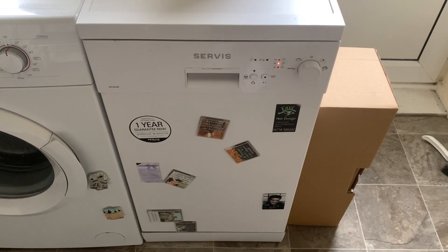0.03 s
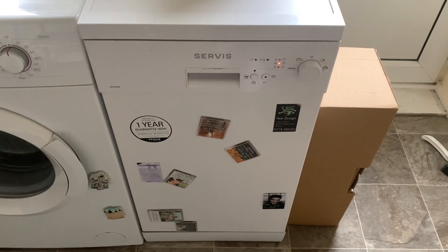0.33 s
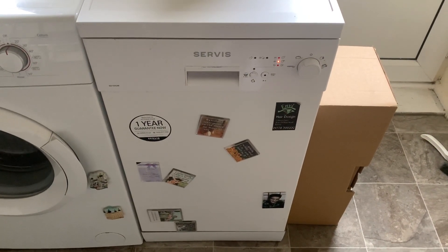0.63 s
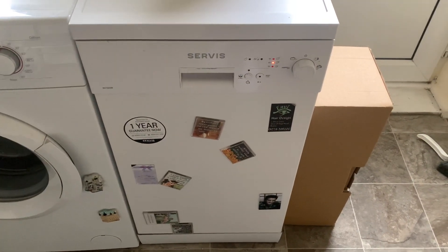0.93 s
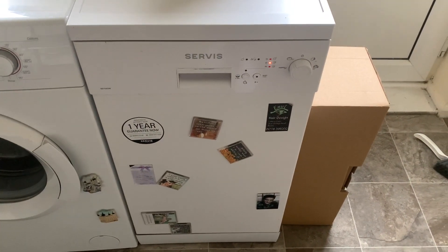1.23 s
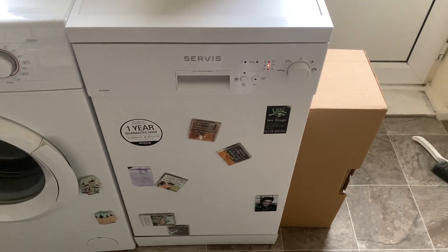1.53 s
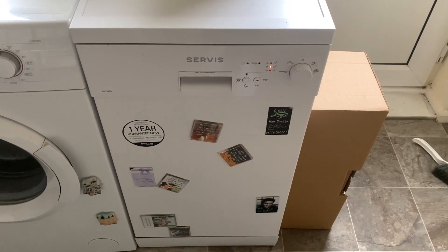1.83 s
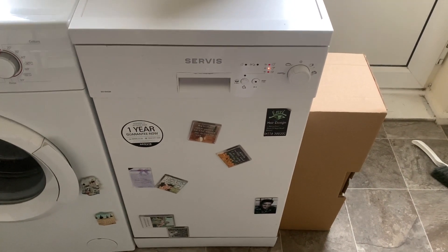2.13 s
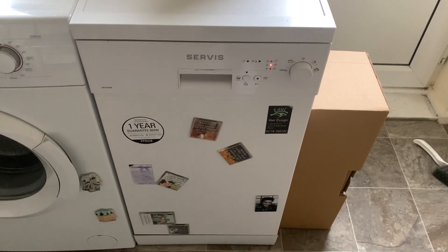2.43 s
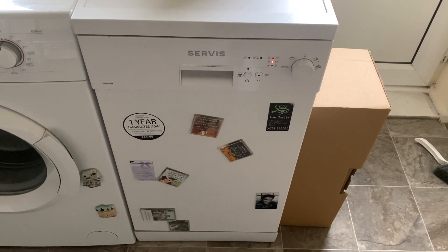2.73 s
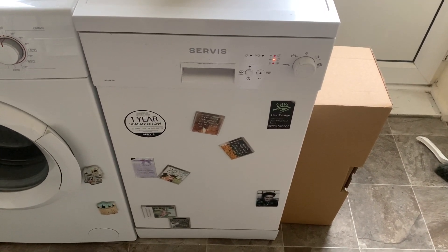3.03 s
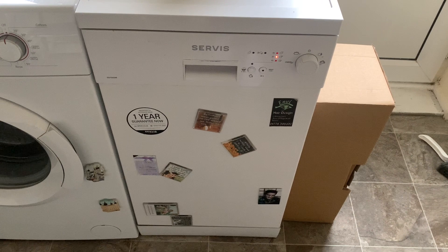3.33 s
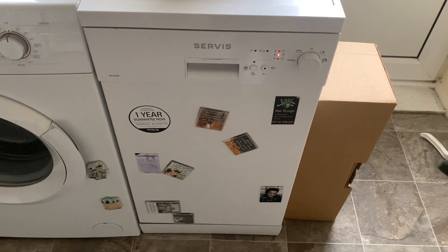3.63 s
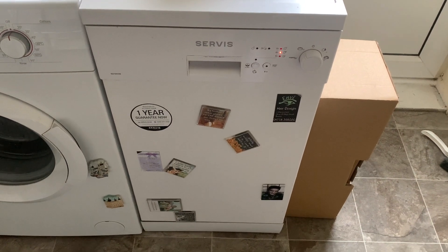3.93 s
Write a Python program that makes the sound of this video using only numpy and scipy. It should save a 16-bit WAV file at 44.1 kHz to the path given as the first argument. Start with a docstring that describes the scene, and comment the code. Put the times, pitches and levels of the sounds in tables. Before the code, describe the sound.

A dishwasher hums and rumbles steadily in a kitchen while spray patters inside and jets slap the walls and dishes. A faint short note opens, then a finger bumps and brushes the nearby microphone once, and the washing continues.

```python
"""A low, booming hum under a wash of spray: a dishwasher mid-cycle in a small tiled kitchen.
The pump hums on multiples of the mains frequency and whines faintly; the cabinet booms with it
and churning water rumbles the panels. Spray hisses and patters in the ringing tub, and jets slap
the walls and dishes. A short, soft note sounds at the very start; about a third of a second in,
a finger ticks and slides once on a hand-held camera."""
import sys
import numpy as np
from scipy import signal
from scipy.fft import rfft, irfft
from scipy.io import wavfile
from scipy.ndimage import uniform_filter1d

SR = 44100
rng = np.random.default_rng(int(sys.argv[2]) if len(sys.argv) > 2 else 0)


def bounce(signal):
    """Save signal as a 16-bit WAV file at the path given by the first command-line argument."""
    frames = np.transpose(np.atleast_2d(signal))
    limited = np.clip(frames, -1, 1)
    pcm = np.round(limited * 32767).astype(np.int16)
    wavfile.write(sys.argv[1], SR, pcm)


N = 176400
TIME_S = np.arange(N) / SR
FREQ_HZ = np.fft.rfftfreq(N, 1 / SR)
LEFT_LEADS_S = .000285

# Stereo placement, with the lows leaning right: frequency_hz, left_minus_right_db
BALANCE = [(50, -5), (85, -5), (120, -3.5), (150, -6), (176, -11), (215, -5), (330, -4), (450, -.5),
           (700, 0), (2400, -.5), (4200, -1.5), (5400, -3), (6700, -1)]


def amp(db):
    """Decibels to gain."""
    return 10 ** (np.asarray(db) / 20)


def unit_rms(x):
    """Scales a signal to an rms of one."""
    return x / np.sqrt(np.mean(abs(x) ** 2) + 1e-30)


def curve_at(points, hz):
    """Reads a curve along a logarithmic frequency axis."""
    point_hz, value = np.transpose(points)
    return np.interp(np.log(hz + 1), np.log(point_hz + 1), value)


def pan(hz):
    """Left and right gains that place each frequency in the stereo image."""
    lean_db = np.atleast_1d(curve_at(BALANCE, hz))
    return amp(np.array([lean_db, -lean_db]) / 2)


def lowpass(x, cutoff_hz, order):
    """Rolls off the highs without shifting phase."""
    return irfft(rfft(x) / (1 + (FREQ_HZ / cutoff_hz) ** order), N)


def drift(rate_hz):
    """Slow random movement with an rms of one."""
    return unit_rms(lowpass(rng.standard_normal(N), rate_hz, order=4))


def white():
    """Two unrelated white noises."""
    return rng.standard_normal((2, N))


def add(mix, start_s, sound):
    """Lays a sound into the mix at its start time."""
    part = mix[:, round(start_s * SR):][:, :sound.shape[1]]
    part += sound[:, :part.shape[1]]


def stereo_noise(pair, db_per_hz):
    """Colours and pans two white signals; the part they share reaches the left side first."""
    # How alike the two sides are, near mono in the bass: frequency_hz, coherence (0-1)
    likeness = [(60, .96), (150, .97), (300, .78), (600, .42), (1400, .3), (2500, .25), (4200, .4),
                (6600, .4), (7400, .05), (8400, .55), (11000, .6), (15000, .5)]
    coherence = np.clip(curve_at(likeness, FREQ_HZ), 0, 1)
    left, unrelated = rfft(pair)
    delayed = left * np.exp(-2j * np.pi * FREQ_HZ * LEFT_LEADS_S)
    right = coherence * delayed + np.sqrt(1 - coherence ** 2) * unrelated
    return irfft(np.array([left, right]) * pan(FREQ_HZ) * amp(db_per_hz), N) * np.sqrt(SR / 2)


def wavering_tone(hz, unsteadiness):
    """A sine that wavers in strength and phase and reaches the left side first."""
    waver = 1 + unsteadiness * (drift(rate_hz=5) + 1j * drift(rate_hz=5)) / np.sqrt(2)
    t = TIME_S - np.array([[0], [LEFT_LEADS_S]])
    carrier = np.exp(2j * np.pi * (hz * t + rng.random()))
    return pan(hz) * unit_rms((waver * carrier).real)


def ringing(modes, half_width_hz):
    """Resonances kept ringing by noise, each with its own phase on either side."""
    out = np.zeros((2, N))
    for hz, db in modes:
        mode = rfft(rng.standard_normal(N)) / (1 + ((FREQ_HZ - hz) / half_width_hz) ** 2)
        side_phase = np.exp(1j * np.pi * rng.random((2, 1)))
        out += amp(db) * unit_rms(irfft(mode * side_phase, N))
    return out


def boom_db():
    """The level of the cabinet's boom as it swells and sinks."""
    # Fader moves of the boom: time_s, level_db
    swells = [(0.0, -43), (0.09, -38), (0.32, -38), (0.34, -42.5), (0.43, -39), (0.9, -37.5), (0.98, -35.5),
              (1.17, -39.5), (1.29, -38), (1.44, -41), (1.64, -33), (1.87, -44), (1.96, -38.5),
              (2.1, -40.5), (2.19, -37), (2.44, -39), (2.66, -44.5), (2.77, -37.5), (2.84, -36),
              (2.97, -40.5), (3.19, -36), (3.29, -41), (3.59, -38.5), (3.69, -36), (3.98, -36), (4.0, -34)]
    return np.interp(TIME_S, *np.transpose(swells))


def pump_hum(mains_hz=50.01):
    """The pump hums on multiples of the mains; the third one booms in the cabinet."""
    # Harmonics of the hum: mains_multiple, level_db, unsteadiness (0-1)
    harmonics = [(1, -53.5, 0.8), (2, -53.5, 0.01), (4, -52.5, 0.55), (5, -65, 0.3), (6, -58, 0.2),
                 (7, -61.5, 0.42), (8, -77.5, 1), (9, -68.5, 0.6), (10, -69, 0.8), (11, -86, 1),
                 (12, -82, 0.4), (13, -71.5, 0.5)]
    hum = sum(amp(db) * wavering_tone(k * mains_hz, unsteadiness) for k, db, unsteadiness in harmonics)
    boom = amp(boom_db()) * wavering_tone(3 * mains_hz, unsteadiness=.04)
    return hum + boom


def water_rumble(lift_db=2, boom_share=.6):
    """Churning water shakes the panels; the deepest part swells with the boom."""
    # Colour of the rumble before the lift: frequency_hz, level_db_per_hz
    colour = [(20, -108), (40, -101), (48, -63.5), (56, -67), (80, -70.5), (100, -80), (135, -79.5),
              (152, -74.5), (175, -75.5), (205, -69.5), (240, -83), (330, -80), (380, -92.5), (480, -88.5),
              (650, -105), (1500, -135)]
    churn = stereo_noise(white(), curve_at(colour, FREQ_HZ) + lift_db)
    deep = lowpass(churn, cutoff_hz=95, order=8)
    swell_db = boom_share * (boom_db() - boom_db().mean())
    return churn - deep + deep * amp(swell_db)


def pump_whine():
    """The pump's faint, smeared whine, high above the hum."""
    # Partials of the whine: pitch_hz, level_db
    partials = [(3709, -80.5), (3989, -85), (4339, -78.2)]
    return ringing(partials, half_width_hz=20)


def spray_hiss(patch_depth_db=1.8):
    """Fine spray: noise with drifting bright and dull patches."""
    spectrogram = signal.stft(white(), nperseg=512)[2]
    patches = rng.standard_normal(spectrogram.shape[1:])
    patches = uniform_filter1d(patches, size=4, axis=0)  # blur across frequency
    patches = unit_rms(uniform_filter1d(patches, size=10, axis=1))  # and across time
    hiss = signal.istft(spectrogram * amp(patch_depth_db * patches))[1]
    return unit_rms(hiss[:, :N])


def drop_patter(drops_per_s=300, spread_db=3, t60_s=.05, kinds=10):
    """Drops of random size land, each setting off one of a few short, noisy rings."""
    sizes = amp(spread_db * np.minimum(rng.exponential(1, N), 4))
    hits = sizes * (rng.random(N) < drops_per_s / SR)
    kind = rng.integers(0, kinds, N)
    t = TIME_S[:SR // 10]
    rings = rng.standard_normal((kinds, 2, len(t))) * amp(-60 * t / t60_s)
    patter = sum(signal.fftconvolve([hits * (kind == k)], ring, axes=1) for k, ring in enumerate(rings))
    return unit_rms(patter[:, :N])


def room_ripple_db(depth_db=2.5, spacing_hz=30):
    """Countless weak resonances of tub and room ripple the spectrum, differently on each side."""
    knots_hz = np.arange(4000) * spacing_hz
    sides = rng.standard_normal((2, len(knots_hz)))
    return depth_db * np.array([np.interp(FREQ_HZ, knots_hz, side) for side in sides])


def spray(patter_db=-8, lift_db=.5, swell_db=.68):
    """Hiss and drops in the ringing tub; the treble rises and falls as the spray arm turns."""
    # Colour of the spray behind the door, before the lift: frequency_hz, level_db_per_hz
    colour = [(150, -105), (450, -89.5), (740, -94.5), (1100, -92.5), (1500, -91), (1850, -95),
              (2500, -99.2), (2950, -101), (3250, -104), (3800, -100), (4450, -99.5), (5200, -104),
              (6700, -107), (7200, -114), (8400, -113.5), (10500, -116), (12000, -119.5), (14500, -124),
              (16000, -132)]
    # Fader moves of the spray's treble: time_s, gain_db
    treble_ride = [(0, -.5), (.35, -0.5), (.45, -2.5), (.53, 0), (.85, 0), (1.08, -0.1), (1.47, -1),
                   (1.6, 0.9), (1.77, 0.5), (1.86, -0.5), (2.0, 0), (2.17, -1.1), (2.52, -0.2), (2.68, -2),
                   (2.8, -0.3), (3.02, -1.2), (3.17, -1), (3.47, -2), (3.82, -0.2), (4, 0)]
    # Resonances of the tub: pitch_hz, level_db
    tub_modes = [(791, -79), (920, -74.5), (1044, -72.5), (1100, -78), (1157, -74), (1238, -74),
                 (1367, -74), (1480, -78), (1556, -74.5), (2003, -81), (2401, -80), (2934, -84)]
    droplets = unit_rms(spray_hiss() + amp(patter_db) * drop_patter())
    water = stereo_noise(droplets, curve_at(colour, FREQ_HZ) + lift_db + room_ripple_db())
    body = lowpass(water, cutoff_hz=1700, order=4)
    treble = (water - body) * amp(np.interp(TIME_S, *np.transpose(treble_ride)))
    swell = amp(swell_db * drift(rate_hz=13))
    return swell * (body + treble + ringing(tub_modes, half_width_hz=14))


def soft_note(pitch_hz=437.4, level_db=-53.5, length_s=.095, fade_s=.025):
    """The machine sounds one short note over the hum, right at the start."""
    envelope = np.sqrt(np.clip(np.minimum(TIME_S, length_s - TIME_S) / fade_s, 0, 1))
    return amp(level_db) * envelope * wavering_tone(pitch_hz, unsteadiness=.15)


def bubbles(centre_hz, width_octaves, samples, per_s=350, decay_cycles=14, pitch_rise=.06):
    """A cloud of tiny bubbles around one pitch, each a blip that rises as it dies away."""
    out = np.zeros((2, samples))
    for onset, pitch, strength, left_phase, right_phase in rng.random((per_s * samples // SR, 5)):
        hz = centre_hz * 2 ** (width_octaves * np.sqrt(3) * (2 * pitch - 1))
        cycles = hz * TIME_S[:SR // 20]
        age = cycles / decay_cycles
        turns = cycles * (1 - pitch_rise * np.expm1(-age)) + np.array([[left_phase], [right_phase]])
        envelope = -np.expm1(-cycles) * np.exp(-age)
        add(out, onset * samples / SR, strength * envelope * np.sin(2 * np.pi * turns))
    return unit_rms(out)


def jet_splashes():
    """Jets slap the walls and dishes: each a quick rush of noise and bubbles that drains away."""
    # One slap a row: start_s, rise_s, decay_s, centre_hz, width_octaves, level_db
    slaps = [(0.069, 0.036, .08, 4300, 0.073, -64), (.10, 0.027, 0.088, 2300, 0.58, -61.5),
             (0.499, 0.037, 0.21, 2260, 0.73, -63.5), (.93, 0.055, 0.086, 1350, 0.16, -59.5),
             (1.252, .012, 0.054, 2240, .3, -55.5), (1.252, .02, 0.083, 1265, 0.34, -56.5),
             (1.39, 0.012, 0.022, 2260, 0.28, -65), (1.525, 0.014, 0.027, 2100, 0.44, -60),
             (1.755, 0.015, 0.019, 5360, .08, -67), (1.97, 0.028, .03, 3800, 0.13, -67),
             (2.24, .015, 0.026, 2100, .4, -62.5), (2.389, 0.03, .05, 1400, 0.33, -60),
             (2.46, .02, 0.029, 2450, 0.39, -66), (2.831, 0.019, 0.033, 3190, 0.47, -61.5),
             (3.11, 0.02, .05, 2220, 0.82, -61), (3.291, 0.017, .03, 2290, 0.28, -66),
             (3.83, 0.028, .06, 2510, 0.49, -58.5), (3.929, 0.02, 0.097, 2030, .9, -63)]
    out, t = np.zeros((2, N)), TIME_S[:SR // 2]
    hz = np.fft.rfftfreq(len(t), 1 / SR)
    for start_s, rise_s, decay_s, centre_hz, width_octaves, level_db in slaps:
        band = np.exp(-(np.log2((hz + 1) / centre_hz) / width_octaves) ** 2 / 2)
        rush = unit_rms(irfft(rfft(rng.standard_normal((2, len(t)))) * band, len(t)))
        water = unit_rms(rush + bubbles(centre_hz, width_octaves, len(t)))
        envelope = np.minimum(t / rise_s, 1) * np.exp(-np.maximum(t - rise_s, 0) / decay_s)
        add(out, start_s, amp(level_db) * envelope * water)
    return out


def finger_touch():
    """A finger ticks on the camera, knocks softly through its case, then slides briefly."""
    # Colour of the tick before its trim: frequency_hz, level_db_per_hz
    tick_colour = [(400, -86), (1200, -81), (2500, -90), (3300, -94), (4300, -72), (5100, -89), (6400, -82),
                   (7500, -97), (11000, -99), (15500, -100)]
    # Colour of the bright slide before its trim: frequency_hz, level_db_per_hz
    slide_colour = [(1000, -115), (3300, -106), (4500, -93), (7000, -101), (8500, -101), (11000, -102.5),
                    (12900, -93), (14600, -99), (15800, -101)]
    touch_s, tick_decay_s, tick_trim_db = .3445, .0021, -2.5
    knock_hz, knock_decay_s, knock_db = 185, .04, -40
    slide_peak_s, slide_width_s, slide_trim_db = .377, .018, 2.5
    t = np.maximum(TIME_S - touch_s, 0)
    tick = stereo_noise(white(), curve_at(tick_colour, FREQ_HZ) + tick_trim_db)
    tick *= np.exp(-t / tick_decay_s)
    knock = amp(knock_db) * np.exp(-t / knock_decay_s) * np.sin(2 * np.pi * knock_hz * t)
    slide = stereo_noise(white(), curve_at(slide_colour, FREQ_HZ) + slide_trim_db)
    slide *= np.exp(-abs(TIME_S - slide_peak_s) / slide_width_s)
    return (t > 0) * (tick + knock + slide)


def scene():
    """The dishwasher's running bed, with the note, the splashes and the finger on top."""
    bed = pump_hum() + water_rumble() + pump_whine() + spray()
    return bed + soft_note() + jet_splashes() + finger_touch()


def record(dry):
    """A steep high cut takes off the very top of the treble."""
    high_cut = signal.firwin(511, cutoff=15750, window=("kaiser", 9), fs=SR)
    return signal.oaconvolve(dry, high_cut[None], "same")


dry = scene()
out = record(dry)
bounce(out)
```